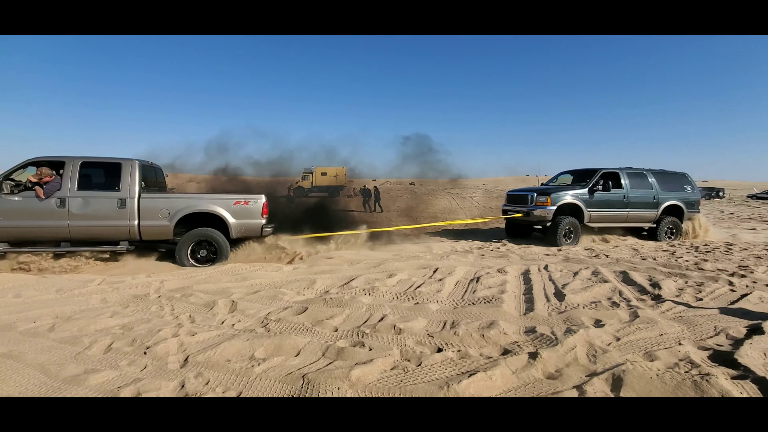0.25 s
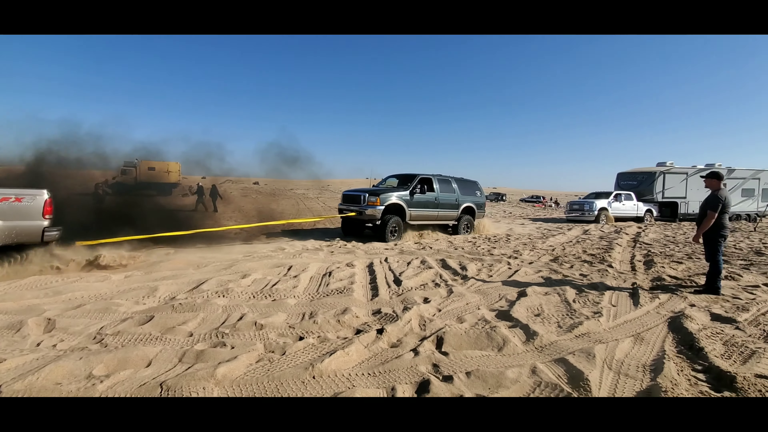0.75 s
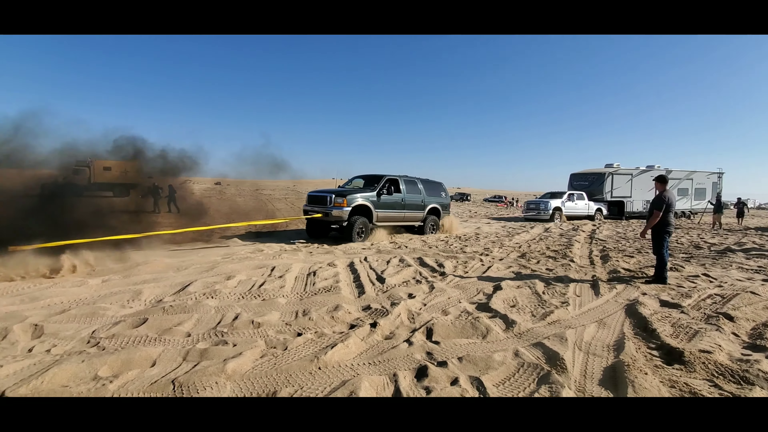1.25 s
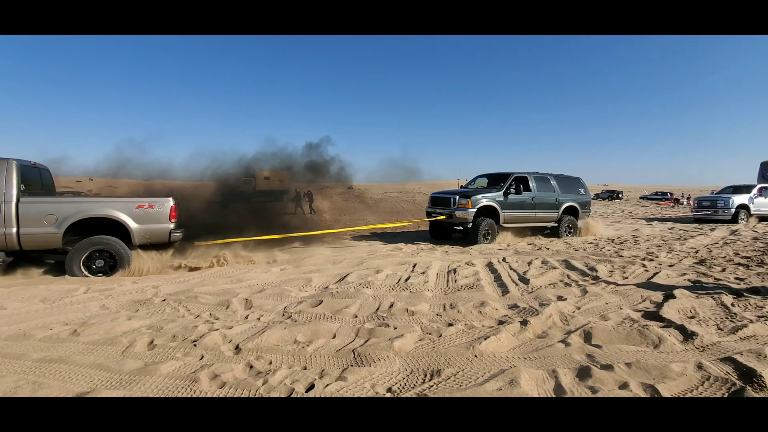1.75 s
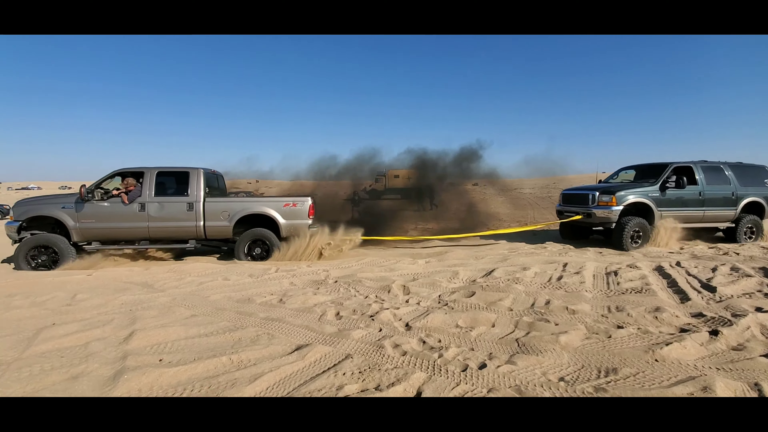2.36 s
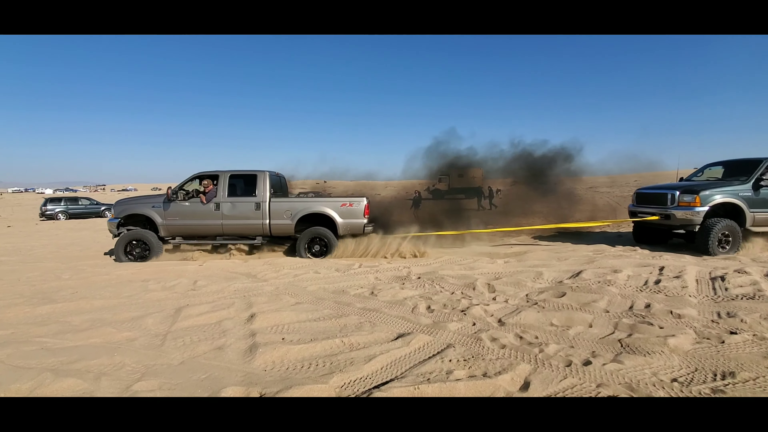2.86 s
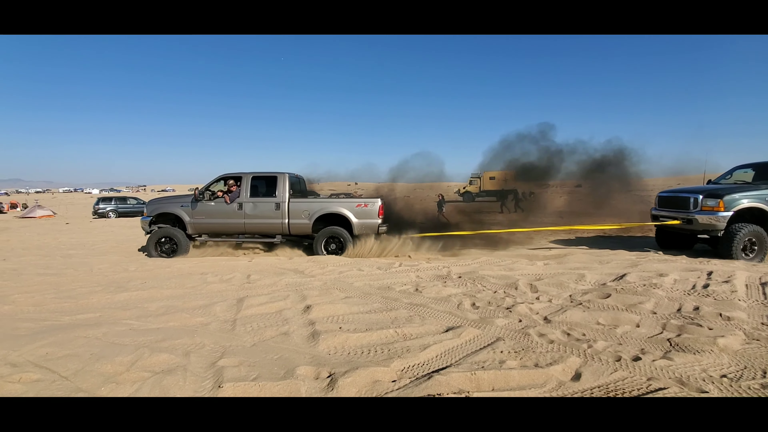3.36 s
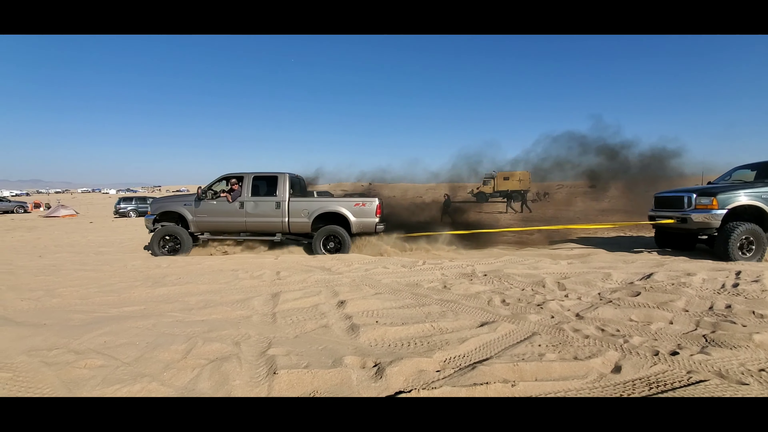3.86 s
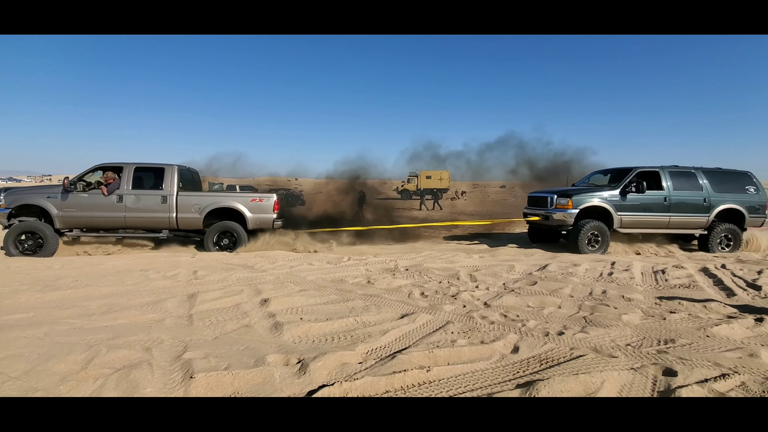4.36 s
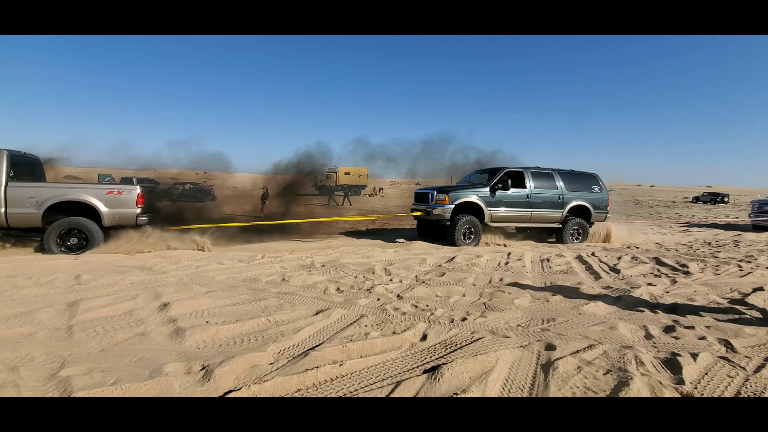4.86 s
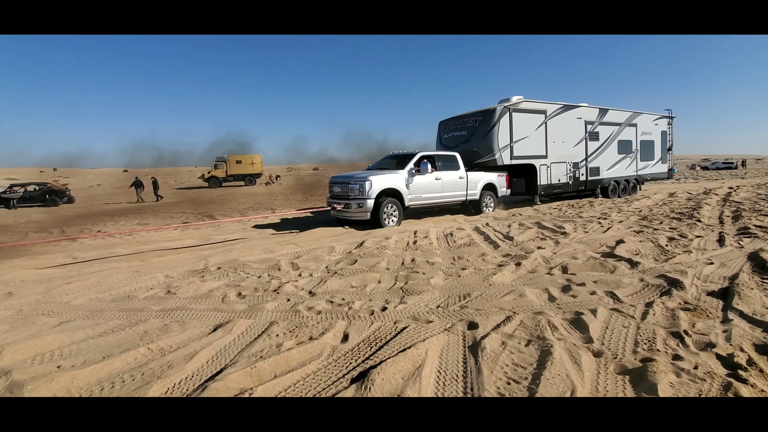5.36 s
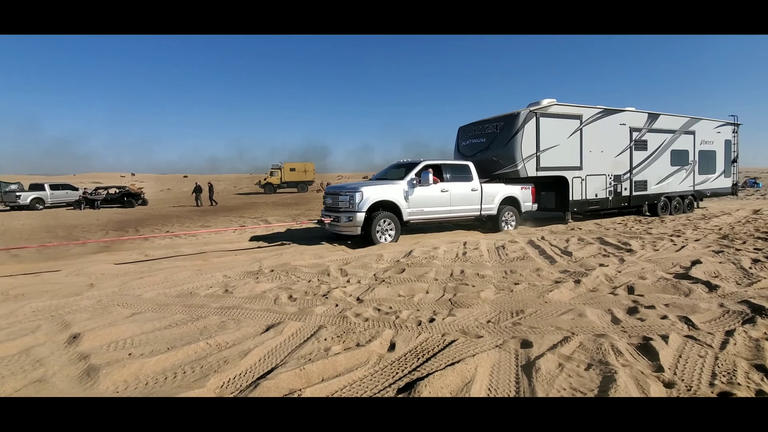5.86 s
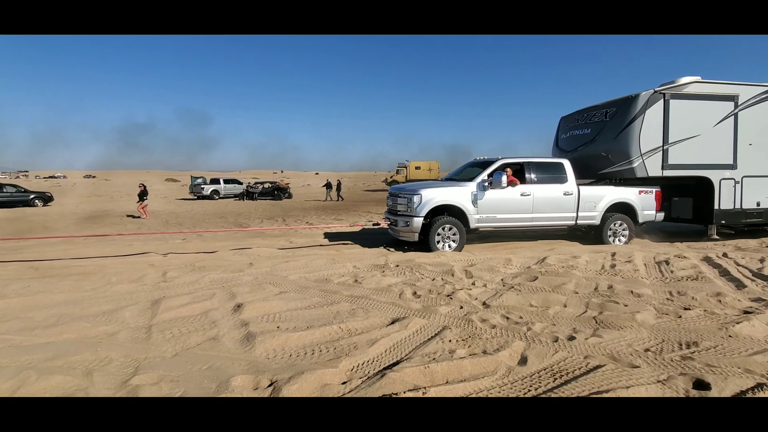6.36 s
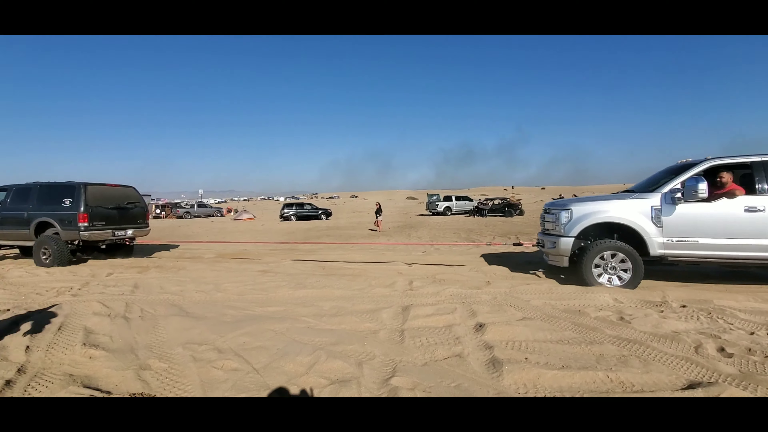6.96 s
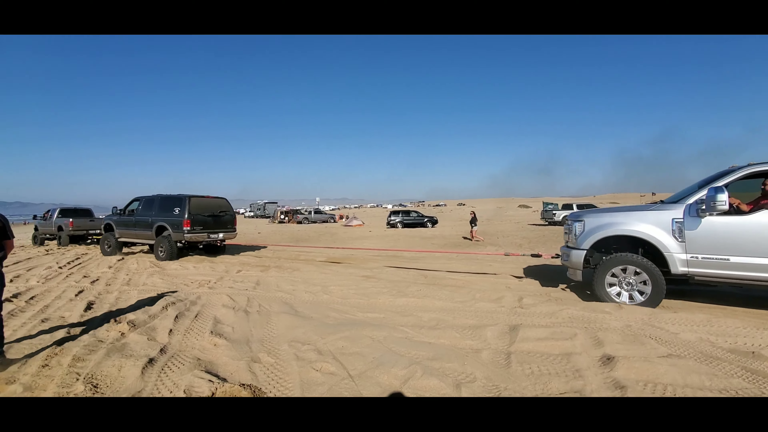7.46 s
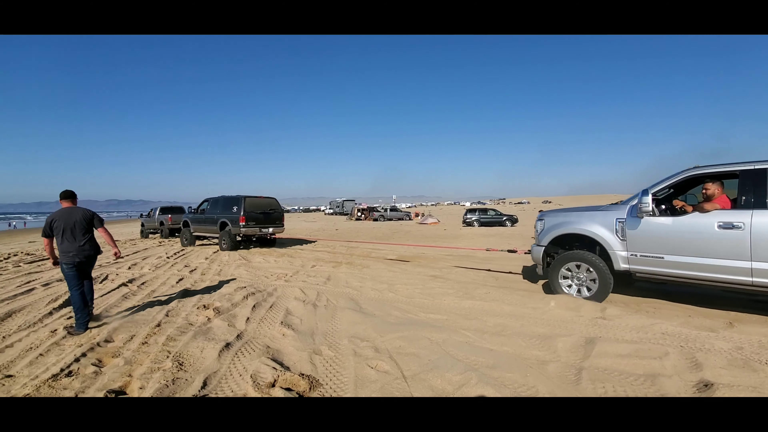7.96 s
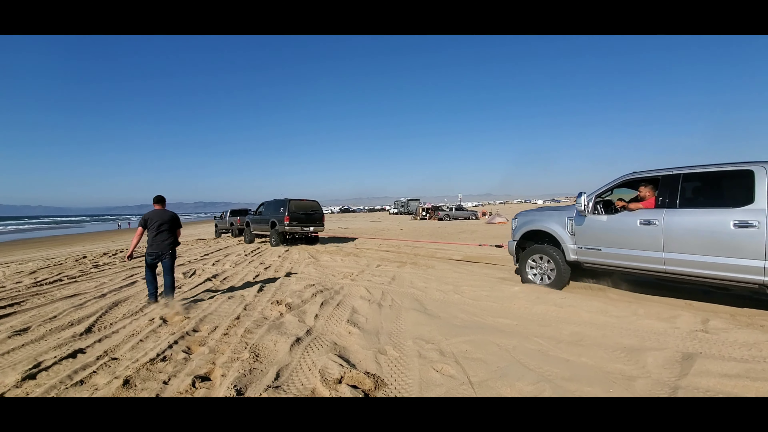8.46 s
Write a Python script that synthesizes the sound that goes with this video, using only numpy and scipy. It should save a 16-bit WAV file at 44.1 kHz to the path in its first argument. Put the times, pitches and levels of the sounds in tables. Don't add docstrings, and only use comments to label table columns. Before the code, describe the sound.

Outdoors on open sand, a nearby diesel pickup roars under full load, its exhaust note sagging as spinning tyres bite, with spraying sand and air hiss. It briefly cuts back near two seconds, then digs in again. At five seconds it abruptly gives way to distant trucks: soft wavering hum, dull drone, faint whines, and wind thumping a handheld phone microphone.

```python
import sys
import numpy as np
from scipy import signal
from scipy.fft import rfft, irfft, next_fast_len
from scipy.io import wavfile
from scipy.ndimage import uniform_filter1d, map_coordinates

SR = 44100
rng = np.random.default_rng(int(sys.argv[2]) if len(sys.argv) > 2 else 0)


def persist_wave(psi):
    counts = np.round(np.clip(psi, -1, 1) * 32767).astype(np.int16)
    wavfile.write(sys.argv[1], SR, np.atleast_2d(counts).T)


def volts_from_db(level):
    exponent = np.asarray(level, float) / 20
    return 10 ** exponent


N = 384552
CHANGE_S = 5.0991


# time_s, four_stroke_cycle_hz, firing_tone_db, uneven_bank_orders_db, bark_db
PULL = [(0, 31, -19, -29, -25), (.12, 30.95, -18, -26, -25), (.27, 31.18, -18, -29, -30),
        (.7, 31.15, -16.5, -26.5, -29), (1.15, 30.5, -17, -27, -32), (1.58, 30.2, -14, -26.5, -25.5),
        (1.68, 31.13, -16, -24, -22.5), (1.75, 31.96, -16, -22, -14), (1.81, 32.27, -17.5, -25.5, -31),
        (1.845, 32.49, -27, -28.5, -36), (1.92, 32.49, -27, -28.5, -34), (1.98, 32.47, -25, -26.5, -32),
        (2.03, 32.44, -26, -26.5, -25), (2.075, 30.94, -13, -20, -19), (2.12, 29.91, -12.5, -24.5, -21),
        (2.37, 29.09, -10.5, -26.5, -19.5), (2.74, 29.02, -13, -30, -27), (3.4, 28.8, -12.5, -29, -25),
        (3.72, 29.09, -14.5, -30.5, -33), (4.16, 28.92, -13, -28.5, -28), (4.6, 28.92, -11.5, -27, -28),
        (4.91, 28.55, -9, -27.5, -22), (5.1, 28.38, -8.5, -28.5, -29)]
# centre_s, cycle_sag_hz, half_length_s, exhaust_lift_db
BITES = [
    (0.093, 3.4, .11, 5),
    (0.497, 3.6, .125, 5.5),
    (0.915, 2.6, .115, 4),
    (1.33, 2.0, .14, 5.5),
    (2.195, 1.5, 0.07, 3.5),
    (2.57, 0.95, 0.11, 0.5),
    (2.985, 0.7, 0.1, 3.5),
]
# time_s, share_of_cut_back_firing (0-1)
GOVERNOR = [
    (0, 0.04),
    (1.66, 0.03),
    (1.72, 0.31),
    (1.81, 0.22),
    (1.86, 0.95),
    (2.05, 0.98),
    (2.095, 0.1),
    (5.1, 0.01),
]
# time_s, share_of_pipe_heard_from_side (0-1)
ABEAM = [
    (0, 0.7),
    (.3, 0),
    (2, 0.04),
    (2.2, 0.4),
    (2.6, 0.8),
    (4.15, 0.98),
    (4.4, 0.04),
    (5.1, 0),
]


def near_truck():
    free_hz, firing_db, bank_db, bark_db = curves(PULL)
    cut = np.clip(curves(GOVERNOR)[0], 0, 1)
    side = np.clip(curves(ABEAM)[0], 0, 1)
    cycle_hz = free_hz - sum(sag_hz * bump(s, half_s) for s, sag_hz, half_s, _ in BITES)
    bite_db = sum(db * bump(s, half_s) for s, _, half_s, db in BITES)
    firing_db = firing_db + bite_db
    bank_db = bank_db + 0.15 * bite_db
    turns = np.cumsum(cycle_hz) / SR
    turns -= turns[round(CHANGE_S * SR)]
    beat = 1 + .4 * np.exp(-(8 * turns % 1) / .3)
    pipe, spells = bark(turns, cut, side)
    noise = (volts_from_db(bark_db - 8.5) * pipe + spells) * tilt(1.8)
    noise += sand_spray(beat, side) + turbo_air() + gas_roar(bank_db, beat)
    return exhaust(turns, cycle_hz, firing_db, bank_db, cut, side) + noise


# level_db; loaded, wheels spinning free, fuel cut back
LOADED = [-34, -20, -6.5, -25, -23, -22, -14.5, 0, -21.5, -20, -11.5, -14.5, -12, -22, -32, -19.5, -32, -20,
          -23, -35, -42, -32, -46, -31, -45, -28]
SPINNING = [-34, -18, -6.5, -23.5, -25.5, -22.5, -15, 0, -24, -16.5, -9.5, -14, -10.5, -17, -27.5, -15.5,
            -25, -17.5, -21, -48, -42, -30, -36, -32.5, -51, -35]
GOVERNED = [-26, -20, -39, -18, -15, 3.5, -11, -6, -17, 1, -2, -29, -45.5, -13.5, -30, -26, -25, -48, -45,
            -30, -27, -50, -47, -45, -36, -34]
# centre_hz, half_width_hz, lift_db
MUFFLER = [(365, 14, 6), (445, 16, 5), (515, 16, 4), (575, 25, -8)]


def exhaust(turns, cycle_hz, firing_db, bank_db, cut, side):
    tone = np.zeros(N)
    gripping = np.arange(N) > 2.0 * SR
    for k, (held_db, free_db, governed_db) in enumerate(zip(LOADED, SPINNING, GOVERNED), 1):
        firing = k == 8
        if firing:
            db = firing_db + 1.0 * wobble(30)
        else:
            loaded_db = np.where(gripping, held_db, free_db)
            order_db = (1 - cut) * loaded_db + cut * (governed_db - 5)
            db = bank_db + 11.0 + order_db + 2.6 * wobble(14)
        if k <= 3:
            db = db - 5 * side
        if k >= 20:
            db = db + 12.7 * side - 4
        if k >= 10:
            db = db + sum(lift_db * np.exp(-((k * cycle_hz - hz) / half_hz) ** 2)
                          for hz, half_hz, lift_db in MUFFLER)
        start = .3 if firing else rng.random()
        drift = (.08 if firing else .3) * wobble(13)
        tone += np.sqrt(2) * volts_from_db(db) * np.sin(2 * np.pi * (k * turns + start) + drift)
    return ports(tone, extra=-12) * tilt(.6)


# centre_hz, width_hz, from_behind_db, from_side_db
PIPE = [(644, 4.7, 0, 19), (817, 66, -13, 10), (1030, 17, 12, -2.5), (1226, 40, 10, 1.5),
        (1474, 38, -5, -1), (1787, 36, -2, 8), (1884, 97, 6, 0)]


def bark(turns, cut, side):
    since = turns % 1
    blasts = np.zeros(N)
    at = np.flatnonzero(np.diff(since) < 0)
    blasts[at] = volts_from_db(2 * wobble(30)[at])
    single = unit(blasts)
    trip = round(SR / 247)
    blasts = .7 * np.roll(blasts, -trip) + blasts + .6 * np.roll(blasts, trip)
    from_blast = np.minimum(since, 1 - since)
    rasp = (.2 + np.exp(-(from_blast / .14) ** 2)) * rng.standard_normal(N)
    fuel = 1 - .8 * cut
    drive = fuel * (unit(blasts) + .4 * unit(rasp))
    behind = filtered(drive, ringing([(c, w, db) for c, w, db, _ in PIPE]))
    abeam = filtered(drive, ringing([(c, w, db) for c, w, _, db in PIPE]))
    pipe = ports(unit((1 - side) * behind + side * abeam), extra=-5)
    return pipe, aimed(fuel * (single + .3 * unit(blasts) + .4 * unit(rasp)))


# centre_s, half_length_s, centre_hz, width_hz, level_db
AIMED = [(.1, 0.072, 950, 55, -29.5), (.1, 0.13, 1210, 55, -30.5), (.5, 0.13, 983, 50, -31.5),
         (1.62, 0.28, 1040, 50, -33.5), (2.3, 0.29, 990, 140, -35), (2.3, 0.23, 1170, 130, -39),
         (2.3, 0.41, 1470, 90, -41), (2.687, 0.063, 1220, 55, -30), (2.67, 0.039, 700, 50, -34),
         (2.95, 0.5, 1710, 70, -37.5), (3.2, 0.29, 777, 50, -37), (3.4, 0.75, 715, 130, -37),
         (3.886, 0.48, 1547, 90, -38), (3.9, 0.2, 1030, 60, -39), (4.3, 0.31, 1247, 55, -33),
         (4.754, 0.32, 990, 28, -38), (4.8, 0.26, 1740, 80, -41), (4.85, 0.22, 1240, 50, -42)]


def aimed(drive):
    total = np.zeros(N)
    for s, half_s, hz, width_hz, db in AIMED:
        mode = unit(signal.lfilter(*signal.iirpeak(hz, hz / (0.78 * width_hz), SR), drive))
        spell = np.exp(-((np.arange(N) / SR - s) / half_s) ** 4)
        total += volts_from_db(db - 1.9) * spell * mode
    return ports(total, extra=-4.5)


# freq_hz, level_db
SPRAY = [(600, -25), (900, 3.5), (1300, -0.5), (1700, 1.5), (2100, -1), (2700, -2.5), (3300, -9.5),
         (4500, -22), (7000, -120)]


def sand_spray(beat, side):
    level = volts_from_db(-31 - 1.5 * side)
    return level * rush(SPRAY, alike=.8, depth_db=2.3, beat=beat) * tilt(1.5)


# freq_hz, level_db
AIR = [(1760, -54), (3000, -5.5), (4080, -4.5), (4780, -5), (6420, -2.5), (7840, -12), (9960, -1),
       (10800, -6), (14800, -11), (15400, -9.5)]
# centre_s, half_length_s, centre_hz, level_db
TURBO = [
    (1.15, 0.86, 4180, -44.5),
    (4.6, .3, 4050, -43.5),
]


def turbo_air():
    hiss = rush(AIR, alike=.45, depth_db=2.5, extra=4.8 - 0.31 * curves(LEAD)[0])
    return volts_from_db(-38.5) * swell() * hiss + whine(TURBO, width_hz=800, extra=-3.1)


# freq_hz, level_db
ROAR = [(60, -53), (150, -9), (200, -12), (240, -13), (290, -17), (370, -3), (520, -12), (620, -17),
        (900, -14.5), (1500, -120)]


def gas_roar(bank_db, beat):
    return volts_from_db(bank_db - 4.5) * rush(ROAR, alike=0.84, depth_db=3.0, beat=beat)


# time_s, firing_hz, tone_db
FAR = [(5.2, 182.4, -20), (5.38, 155.4, -23.5), (5.53, 162, -20.5), (5.63, 194.3, -22), (5.75, 199, -24),
       (5.9, 177.4, -23), (5.96, 158.2, -25), (6.02, 129.7, -29), (6.06, 167.7, -44), (6.12, 175.8, -29),
       (6.2, 182.3, -25), (6.4, 201, -33.5), (6.65, 204.6, -35.5), (7.0, 197, -32.5), (7.2, 205.7, -31),
       (7.4, 199, -24.5), (7.6, 191.2, -32.5), (7.8, 195.5, -31), (8.2, 188.8, -41), (8.6, 185, -37)]
# time_s, nearness_db, throttle_db
APPROACH = [(5.15, 4, -12), (5.35, 0.5, -3.5), (5.72, -2, -8), (5.8, -2.5, -9), (5.88, -5, -2.5),
            (5.935, 0, 6.5), (6.03, -7, 3), (6.45, -4.5, 1), (6.8, 0, -11.5), (6.95, 3, -2.5),
            (7.4, 1.5, -0.5), (7.6, 3, -3), (8.0, 6.5, 3), (8.4, 8.5, 3), (8.72, 3.5, 1.5)]
# freq_hz, level_db
DRONE = [(71, -17), (120, 2), (145, -8.5), (198, 3), (262, -24), (381, -16), (560, -20), (814, -13),
         (912, -18), (1220, -28.5), (1800, -36), (2340, -37), (3960, -120)]
TYRES = [(710, -25), (1200, -2), (1310, -3.5), (1450, -0.5), (1690, -2), (2300, -4), (3210, -7),
         (3850, -11), (5420, -19.5), (8000, -32), (10400, -53), (17600, -120)]
TOP = [(4120, -5), (7000, -4.5), (7730, -15), (8260, -14), (9180, -4.5), (10000, -6.5), (11800, -6),
       (15400, -18)]


def far_trucks():
    firing_hz, tone_db = curves(FAR)
    near_db, throttle_db = curves(APPROACH)
    phase = 2 * np.pi * np.cumsum(firing_hz) / SR + 0.3 * wobble(14)
    unsteady = volts_from_db(1.8 * wobble(8) + 1.5 * wobble(30))
    partials = np.sin(phase) + volts_from_db(-14.5) * np.sin(2 * phase) + volts_from_db(-17) * np.sin(phase / 2)
    tone = volts_from_db(tone_db - 5.0) * unsteady * partials
    noise = volts_from_db(-34.5 + throttle_db) * rush(DRONE, alike=0.24, depth_db=0.0)
    tyres_db = -45 + 0.36 * near_db + 0.46 * throttle_db
    noise += volts_from_db(tyres_db) * swell() * rush(TYRES, alike=.58, depth_db=2.4)
    noise += volts_from_db(-56.5 + near_db) * swell() * rush(TOP, alike=0.14, depth_db=3.5)
    return ports(tone, extra=-2) + noise + far_machinery()


# centre_s, half_length_s, pitch_hz, level_db
GEAR = [
    (5.35, .12, 803, -45),
    (5.7, .25, 826, -52),
    (6.62, 0.14, 830, -47),
    (7.27, 0.16, 834.5, -45),
    (7.75, 0.11, 806, -42),
    (8.25, 0.39, 766, -42),
    (8.7, 0.22, 795, -45),
]
# centre_s, half_length_s, pitch_hz, level_db
FAN = [
    (6.65, 0.21, 3660, -58),
    (7.05, 0.09, 3730, -54),
    (7.35, 0.24, 3309, -57),
    (8.3, .3, 3326, -63),
    (7.88, 0.13, 1525, -50),
    (8.3, 0.25, 1430, -50),
]
# time_s, centre_hz, level_db
SLIDING_RUSH = [(6.7, 2800, -64), (6.85, 2850, -57), (7.0, 2900, -51), (7.15, 2600, -50), (7.3, 2330, -51),
                (7.45, 2250, -47), (7.6, 2250, -58), (7.9, 2260, -49), (8.2, 2300, -52), (8.45, 2150, -49),
                (8.72, 2200, -53)]
# centre_s, half_length_s, centre_hz, level_db
SPOOL = [
    (5.47, 0.28, 4970, -52),
]


def far_machinery():
    gears = volts_from_db(0.5) * whine(GEAR, width_hz=65) * tilt(1.5)
    fans = whine(FAN, width_hz=120) + sliding(SLIDING_RUSH, width_hz=300)
    return gears + fans + whine(SPOOL, width_hz=1300)


# time_s, centre_hz, level_db
RISING = [
    (8.1, 2550, -66),
    (8.3, 2750, -47),
    (8.5, 3000, -48),
    (8.62, 3050, -64),
]


def rising_fan():
    return sliding(RISING, width_hz=450)


# start_s, peak_db
GRIT = [(5.8247, -35), (5.9254, -32), (5.9389, -27), (6.0014, -31), (6.0392, -34), (6.0851, -36),
        (6.3879, -31), (6.4248, -32.5), (6.6318, -37)]


def grit():
    env, t = np.zeros(N + SR), np.arange(SR // 10) / SR
    for s, db in GRIT:
        env[round(s * SR):][:len(t)] += volts_from_db(db - 2) * burst(t, decay_s=.005)
    return env[:N] * rush(TYRES, alike=.58, depth_db=1)


# time_s, strength_db
BREEZE = [(0, -20.5), (.55, -38.5), (1.48, -38), (1.8, -29.5), (2.7, -27), (3.2, -26.5), (4, -26.5),
          (4.4, -31), (4.96, -41), (5.3, -39), (5.83, -35), (6.3, -34.5), (6.69, -39.5), (7.3, -34.5),
          (7.55, -40.5), (7.9, -37.5), (8.5, -35.5), (8.72, -38)]
# freq_hz, level_db
BUFFET = [(15, -34), (35, -7.5), (80, 1), (130, -4.5), (220, -7.5), (400, -27.5), (900, -58), (2000, -120)]
FLUTTER = [(60, -45), (150, 2.5), (300, 1), (600, -9), (1200, -18), (2500, -32), (5000, -46), (12000, -120)]


def wind():
    breeze = volts_from_db(curves(BREEZE)[0])
    left_lumps = wobble(22) + 2.2 * wobble(70)
    right_lumps = wobble(22) + 0.72 * wobble(70)
    lumps = np.tanh(0.43 * np.array([left_lumps, right_lumps]))
    thump = unit(volts_from_db(4.4 * lumps)) * coloured(rng.standard_normal((2, N)), BUFFET)
    thump_level = volts_from_db(5) * np.hypot(breeze, gusts(0.97))
    steady = np.hypot(volts_from_db(1.5) * breeze, volts_from_db(-27) * gusts(0.13)) * unit(volts_from_db(7.5 * lumps))
    flutter = (steady + puffs()) * coloured(rng.standard_normal((2, N)), FLUTTER)
    return thump_level * thump + flutter + air_pushes()


# centre_s, peak_db, left_minus_right_db, half_length_s
GUSTS = [(0.0, -30, 4, 0.038), (0.167, -32, 5, 0.045), (0.395, -29, 6, 0.06), (1.743, -26.5, -1, 0.18),
         (1.956, -26, -14, 0.036), (2.086, -20, 0, 0.028), (2.514, -25, -2, 0.13), (3.074, -22, -1, 0.023),
         (5.38, -28.5, 17, 0.093), (5.603, -23.5, 20, 0.073), (6.956, -34, -5, 0.13),
         (7.663, -28, -27, 0.036), (8.504, -30.5, -14, 0.11)]


def gusts(lean):
    return np.sqrt(sum((volts_from_db(db) * bump(s, half_s) * split(lean * lean_db)) ** 2
                       for s, db, lean_db, half_s in GUSTS))


# start_s, peak_db, left_minus_right_db
PUFFS = [(0.017, -28, 10), (0.157, -25, 1), (1.717, -22, -6), (2.055, -23.5, -5), (2.503, -17.5, -1),
         (2.579, -20, 10), (2.717, -20, 29), (5.357, -28.5, 13), (5.442, -36, 2.5), (5.547, -24.5, 8),
         (5.936, -33.5, 17), (6.308, -31, 12), (6.672, -41, 3), (8.701, -30, 0), (7.015, -36, 1),
         (6.969, -28, 1), (7.201, -37, -7), (7.563, -42, -2), (7.242, -40, 10), (7.416, -31, 10),
         (7.694, -35, 8), (7.769, -35, 1), (7.956, -32, 9), (8.131, -33, -1), (8.495, -27, -2),
         (8.515, -24, -1), (8.556, -26, 1)]


def puffs():
    out, t = np.zeros((2, N + SR)), np.arange(SR // 10) / SR
    for s, db, lean_db in PUFFS:
        gain = 1.3 * volts_from_db(db + 7) * split(1.8 * lean_db)
        out[:, round(s * SR):][:, :len(t)] += gain * burst(t, decay_s=.007)
    return out[:, :N]


# centre_s, peak_db, left_minus_right_db, half_length_s, pitch_hz
THUDS = [(5.376, -13, 22, 0.01, 75), (5.411, -17, 15, 0.012, 88.5), (5.463, -19, 19, 0.017, 82),
         (5.549, -5.5, 26, 0.012, 76), (5.575, -8.5, 29, 0.047, 75.6), (5.635, -4.5, 29, 0.014, 84),
         (5.678, -10, 23, 0.0095, 90), (5.696, -11.5, 20, 0.023, 87), (5.752, -18, 14, 0.0088, 98),
         (5.978, -23, -3, 0.042, 94.2), (6.001, -19, -4, 0.0088, 101), (6.061, -13, -3.5, 0.019, 91),
         (6.117, -34, -3, 0.011, 83), (6.239, -30, -7, 0.0096, 88.7), (6.301, -27, -9, 0.019, 84),
         (6.345, -21, -6, 0.011, 89), (6.466, -21, -4, 0.031, 79.6), (6.572, -22, -9, 0.01, 85.2),
         (6.637, -21, -4, 0.0076, 92), (6.685, -18, 1, 0.013, 106), (6.731, -19.5, 0, 0.0085, 95.8),
         (6.768, -21, -1, 0.018, 98), (6.936, -15.5, 1, 0.01, 88.3), (7.004, -20.5, -7, 0.027, 83),
         (7.144, -19, -9, 0.0069, 110.5), (7.212, -19, -15, 0.013, 93), (7.407, -12.5, 1, 0.022, 91),
         (7.494, -18, -2.5, 0.012, 81), (7.835, -22, -16, 0.029, 61.6), (7.939, -19, -23, 0.03, 94),
         (8.108, -20, -5, 0.021, 80), (8.167, -25, -16, 0.023, 91), (8.245, -14, 0, 0.026, 91),
         (8.369, -18.5, -5, 0.012, 91.5), (8.439, -18, -19, 0.018, 85.5), (8.527, -16, -16, 0.024, 93)]
FLAPS = [(5.356, -21, 21, 0.021, 320), (5.443, -16, 14, 0.0036, 446), (5.534, -24, 10, 0.007, 319),
         (5.548, -13, 21, 0.005, 364), (5.582, -21, 15, 0.01, 382), (5.623, -15, 8.5, 0.0071, 299),
         (5.674, -20.5, 15, 0.013, 272), (5.75, -21, 7, 0.0073, 288), (5.909, -21, 15, 0.0096, 369),
         (5.943, -28, 10, 0.026, 365), (5.946, -21, 0, 0.012, 360), (6.003, -21, 11, 0.0043, 382),
         (6.038, -23.5, 2, 0.017, 300), (6.115, -26, -7, 0.013, 355), (6.306, -22.5, 2, 0.013, 380.5),
         (6.345, -24, 0, 0.0056, 349), (6.679, -29, 3, 0.009, 303.2), (6.876, -20, -14, 0.005, 354),
         (6.888, -25, 12, 0.027, 338), (6.921, -18.5, 9, 0.0077, 367), (6.973, -15.5, 7, 0.0058, 401),
         (7.031, -19, -1, 0.0043, 315.5), (7.253, -24, 11, 0.011, 352), (7.405, -19, 4, 0.004, 330),
         (7.926, -25, 3, 0.004, 376), (7.95, -27, 9, 0.0055, 335), (8.031, -22, -6, 0.006, 320),
         (8.16, -21, 2, 0.0048, 403), (8.259, -23, -1, 0.008, 325), (8.476, -14, 0, 0.0041, 321),
         (8.514, -12.5, 7, 0.017, 367), (8.562, -15.5, 1, 0.0064, 367), (8.619, -18.5, 1, 0.0088, 305),
         (8.666, -21.5, 8, 0.006, 397)]


def air_pushes():
    return pushes(THUDS, -3.5) + pushes(FLAPS, -8)


def pushes(rows, offset_db):
    out, t = np.zeros((2, N + SR)), np.arange(-SR // 8, SR // 8) / SR
    for (s, db, lean_db, half_s, hz), (start, slide) in zip(rows, rng.random((len(rows), 2))):
        cycles = start + hz * t * (1 + .5 * (slide - .5) * t / half_s)
        shape = np.sin(2 * np.pi * cycles) + .3 * np.sin(2 * np.pi * (1.9 * cycles + slide))
        bell = np.exp(-(t / (1.11 * half_s)) ** 2)
        out[:, round(s * SR):][:, :len(t)] += volts_from_db(db + offset_db) * split(lean_db) * bell * shape
    return out[:, SR // 8:][:, :N]


# time_s, left_port_lead_samples
LEAD = [(0, 14.5), (.6, 21.5), (1.2, 24.5), (1.8, 20.5), (2.6, 13.5), (3.1, 9), (3.8, 8.5), (4.2, 12),
        (4.6, 19), (5.1, 21.5), (6.68, 21.5), (6.8, -14), (7.05, -14.5), (7.4, -17), (8.0, -17),
        (8.4, -16.5), (8.72, -19.5)]


def ports(x, extra=0):
    lead = curves(LEAD)[0] + extra
    return np.array([x, map_coordinates(x, [np.arange(N) - lead], mode="nearest")])


def rush(spectrum, alike, depth_db, beat=1, extra=0):
    share = np.sqrt(np.clip(alike, 0, 1))
    scattered = np.array([patchy(depth_db), patchy(depth_db)])
    mixed = share * ports(patchy(depth_db), extra) + np.sqrt(1 - share ** 2) * scattered
    return coloured(beat * mixed, spectrum)


def fuzz(width_hz):
    return wobble(width_hz) + 1j * wobble(width_hz)


def whine(spells, width_hz, extra=0):
    envelope = fuzz(width_hz)
    t = np.arange(N) / SR
    line = sum(volts_from_db(db) * bump(s, half_s) * np.real(envelope * np.exp(2j * np.pi * hz * t))
               for s, half_s, hz, db in spells)
    return ports(line, extra)


def sliding(rows, width_hz):
    hz, db = curves(rows)
    carrier = np.exp(2j * np.pi * np.cumsum(hz) / SR)
    return ports(volts_from_db(db) * np.real(fuzz(width_hz) * carrier))


def ringing(modes):
    return lambda f: sum((-1) ** k * volts_from_db(db) * 1j * f * w / (c * c - f * f + 1j * f * w)
                         for k, (c, w, db) in enumerate(modes))


def patchy(depth_db):
    z = signal.stft(rng.standard_normal(N + 512), nperseg=512)[2]
    field = uniform_filter1d(rng.standard_normal(z.shape), size=5, axis=0)
    field = uniform_filter1d(field, size=10, axis=1)
    return signal.istft(z * volts_from_db(depth_db * unit(field)), nperseg=512)[1][:N]


def filtered(x, response):
    m = next_fast_len(N + 8192)
    return irfft(rfft(x, m) * response(np.fft.rfftfreq(m, 1 / SR)), m)[..., :N]


def coloured(x, spectrum):
    f, db = np.transpose(spectrum)
    return unit(filtered(x, lambda hz: volts_from_db(np.interp(np.log(hz + 1), np.log(f + 1), db))))


def swell():
    return volts_from_db(0.55 * wobble(5.8) + 0.8 * wobble(18) + 1.0 * wobble(40))


def wobble(rate):
    at = np.arange(0, N + 16, 16)
    knots = rng.standard_normal(int(N * rate / SR) + 4)
    return np.interp(np.arange(N), at, map_coordinates(knots, [at * rate / SR]))


def burst(t, decay_s):
    return (1 - np.exp(-t / .0008)) * np.exp(-t / decay_s)


def bump(s, half_s):
    return np.exp(-((np.arange(N) / SR - s) / half_s) ** 2)


def split(pan_db):
    return np.sqrt(2 / (1 + volts_from_db(np.array([[-2], [2]]) * pan_db)))


def tilt(db):
    return volts_from_db([[-db], [db]])


def unit(x):
    return x / np.sqrt(np.mean(x ** 2) + 1e-20)


def curves(rows):
    s, *cols = np.transpose(rows)
    return [np.interp(np.arange(N) / SR, s, c) for c in cols]


# time_s, level_db
FADE = [
    (5.1, -26),
    (5.13, -64),
    (5.155, -12),
    (5.2, -4),
    (5.3, 2.5),
]


def scene():
    before = np.arange(N) < round(CHANGE_S * SR)
    after = ~before * volts_from_db(curves(FADE)[0])
    far = far_trucks() + grit() + rising_fan()
    return before * near_truck() + after * far + (before + after) * wind()


def low_pass(x):
    return signal.sosfilt(signal.butter(12, 15600, fs=SR, output="sos"), x)


def record(dry):
    soft = dry / (1 + np.abs(dry / .95) ** 8) ** (1 / 8)
    port_hz, port_half_hz, port_db = 5700, 2000, 1.9
    port = lambda hz: tilt(1) ** 0 * volts_from_db(np.array([[-1], [1]]) * port_db * np.exp(-((hz - port_hz) / port_half_hz) ** 2))
    mix = filtered(soft, lambda hz: port(hz) * (hz < 15490))
    return low_pass(mix)


dry = scene()
out = record(dry)
persist_wave(out)
```